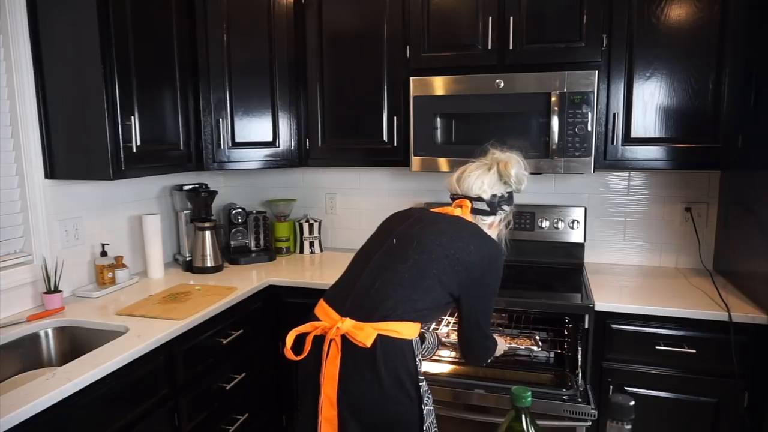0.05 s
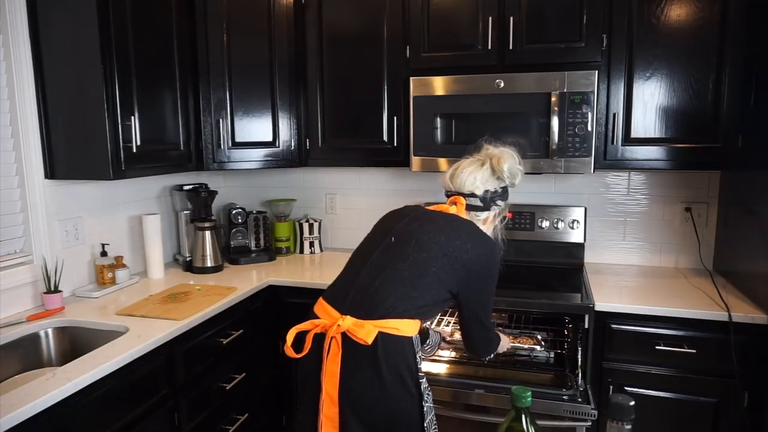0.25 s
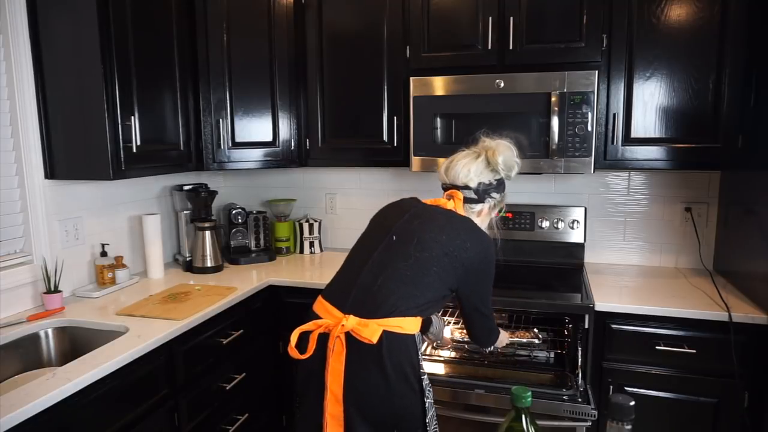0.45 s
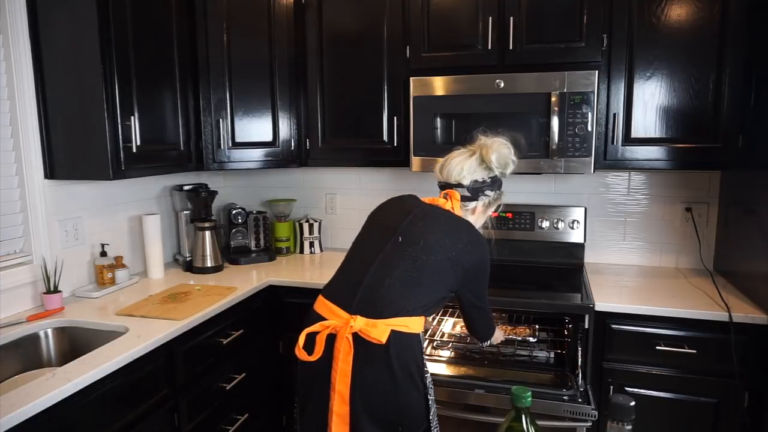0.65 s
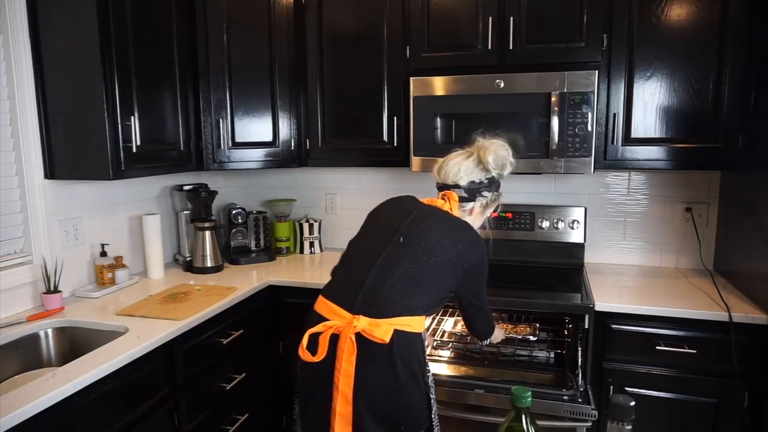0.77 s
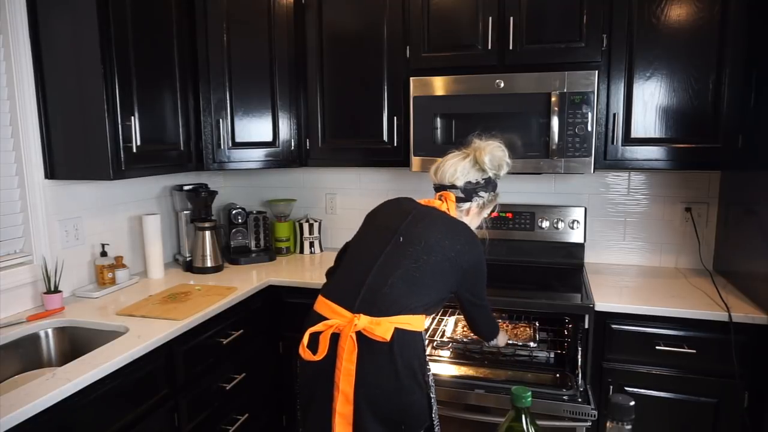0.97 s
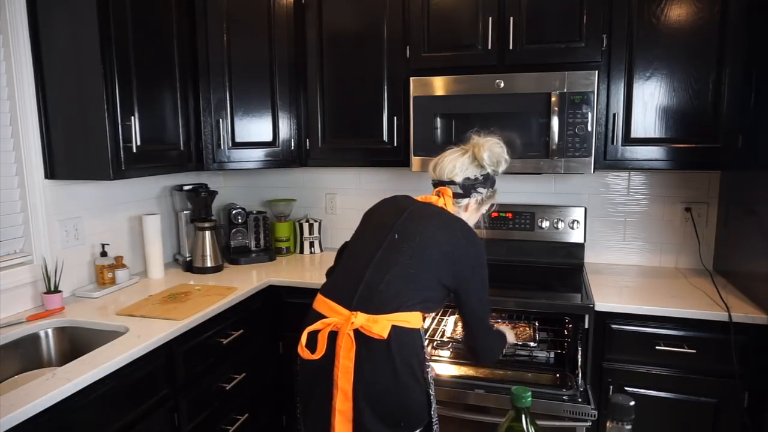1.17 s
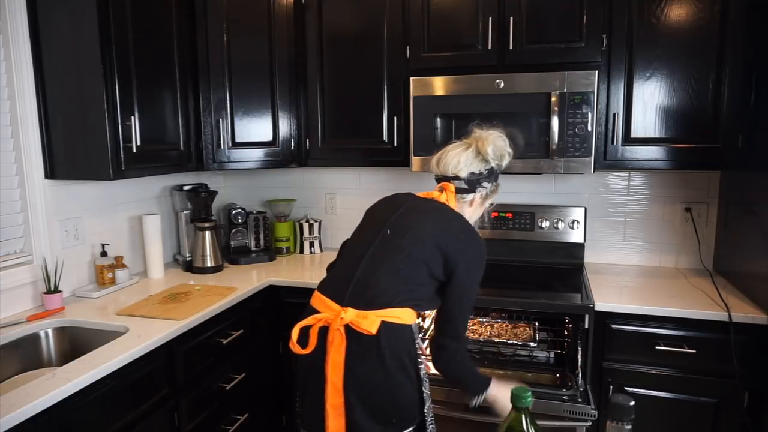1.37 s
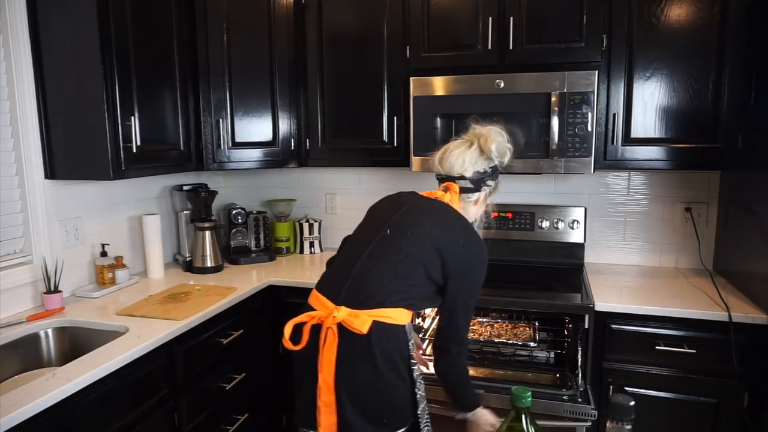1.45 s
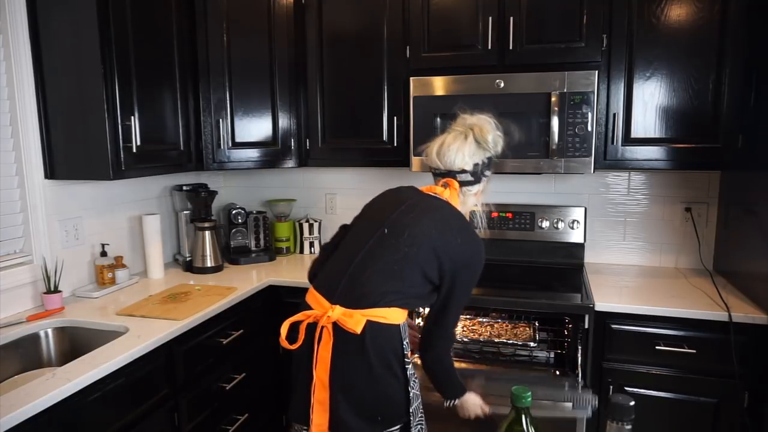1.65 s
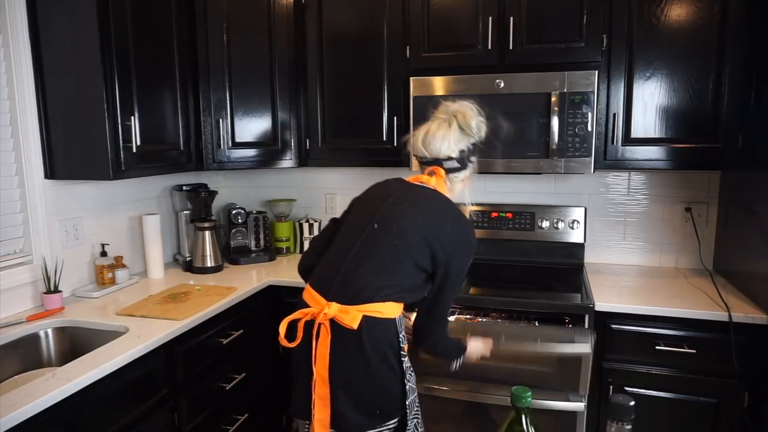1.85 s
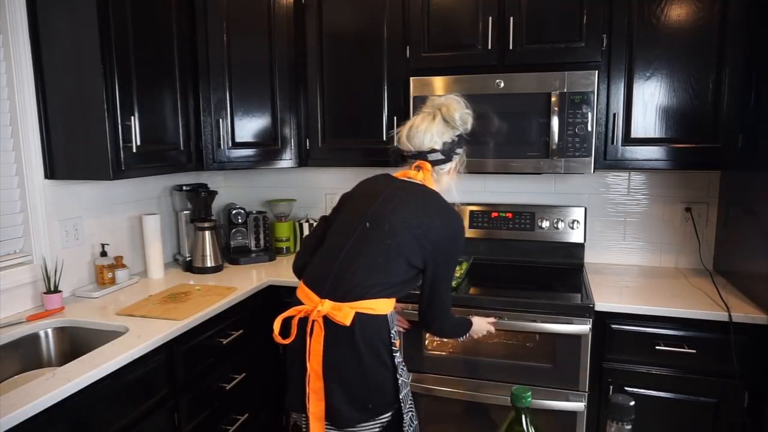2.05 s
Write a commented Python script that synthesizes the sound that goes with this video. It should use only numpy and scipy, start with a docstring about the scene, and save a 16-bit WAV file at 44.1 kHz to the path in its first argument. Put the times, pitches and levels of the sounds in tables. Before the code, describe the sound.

In a quiet home kitchen, light scuffs lead into a harsh, ringing slide of a dish over oven wires, suddenly cut; after a short pause come hollow door thuds, hinge pings and a soft creak, microphone in the room.

```python
"""A kitchen: a baking dish is nudged, then dragged along the wire rack of an electric oven; an edit cuts this off.
Then the oven door is lifted: dull knocks of the door, pings of its hinge spring, a creak, over quiet air.
Friction is a dense train of random slips, filtered by the walls, dish and wires that it shakes.
Knocks are noise dying band by band with a few door modes; pings are struck modes with a noisy clatter."""
import sys
import numpy as np
from scipy import signal
from scipy.fft import rfft, irfft
from scipy.io import wavfile

SR = 44100
rng = np.random.default_rng(int(sys.argv[2]) if len(sys.argv) > 2 else 0)


def gain_from_db(level_db):
    """Convert decibel levels to linear amplitude factors (20 dB per decade)."""
    decades = np.asarray(level_db, float) / 20
    return 10 ** decades


def persist_wave(psi):
    """Save psi, clipped to +-1, as 16-bit WAV."""
    counts = np.round(np.clip(psi, -1, 1) * 32767).astype(np.int16)
    wavfile.write(sys.argv[1], SR, np.atleast_2d(counts).T)


N = 92610

CUT_S = 0.8025   # an edit cuts the slide off here
MODES_SPREAD_S = 0.004   # modes do not all start at once
TOUCHES = 6   # lesser contacts that follow each knock or ping


def rms_one(x):
    """Normalisation: scale to unit rms."""
    return x / np.sqrt(np.mean(x ** 2) + 1e-20)


def at_hz(points, hz):
    """Interpolation of a frequency table along a logarithmic frequency axis."""
    table_hz, values = np.array(points).T
    return np.interp(np.log(hz), np.log(table_hz), values)


def in_time(rows):
    """Linear interpolation in time: each column becomes a curve with one value per sample."""
    s, *columns = np.transpose(rows)
    return [np.interp(np.arange(N) / SR, s, column) for column in columns]


def colour(x, spectrum, rings=()):
    """Linear filtering: a broad spectrum plus narrow resonances, normalised to rms 1."""
    hz = np.maximum(np.arange(N // 2 + 1) * SR / N, 1)
    in_range = (hz > spectrum[0][0]) * (hz < spectrum[-1][0])
    broad = gain_from_db(at_hz(spectrum, hz)) * in_range
    lift = 1
    for centre_hz, width_hz, db in rings:
        lift = lift + 4 * gain_from_db(db) / (1 + 2j * (hz - centre_hz) / width_hz)
    return rms_one(irfft(rfft(x) * broad * lift, N))


def grains():
    """Stick-slip friction: dense random slips of uneven size."""
    per_s, spread_db = 12000, 2.0
    size = gain_from_db(spread_db * np.minimum(rng.exponential(1, N), 2)) * rng.standard_normal(N)
    return size * (rng.random(N) < per_s / SR)


def clicks(s, gains):
    """Impulsive excitation: impulses at the given times."""
    out = np.full(N, 1e-18)
    np.add.at(out, (np.asarray(s) * SR).astype(int), gains)
    return out


def dying(x, t60):
    """Exponential decay: each impulse becomes an envelope falling 60 dB in t60."""
    return signal.lfilter([1], [1, -gain_from_db(-60 / (t60 * SR))], x)


def smear(x):
    """Moving average: an onset is spread over the starting times of the modes."""
    window = np.ones(int(MODES_SPREAD_S * SR))
    return signal.lfilter(window / len(window), [1], x)


def ring(x, hz, t60):
    """Damped resonator: a unit click sets a sine of height 1 ringing."""
    r, w = gain_from_db(-60 / (t60 * SR)), 2 * np.pi * hz / SR
    return signal.lfilter([0, np.sin(w)], [1, -2 * r * np.cos(w), r * r], x)


def near(hz, struck_hz, reach):
    """Selective excitation: modes far from the excited pitch get less, 6 dB less at reach octaves."""
    return gain_from_db(-6 * (np.log2(hz / struck_hz) / reach) ** 2)


def air():
    """Stationary background noise: coloured Gaussian noise at a constant level."""
    # spectrum of the kitchen air: (frequency [Hz], relative level per Hz [dB])
    air_colour = [(30, -11.5), (280, -6), (1100, -8.5), (7400, -22), (16000, -41)]
    level_db = -58.5
    return gain_from_db(level_db) * colour(rng.standard_normal(N), air_colour)


def scuffs():
    """Friction under brief force: each small shove has a quick rise, then an exponential decay."""
    # light scuffs, of the dish before the drag and once of the door: (time [s], level [dB], rise [s])
    scuff_rows = [(0.024, -51.5, 0.0066), (0.084, -53.5, 0.011), (.121, -46.5, .005), (0.158, -48.5, 0.006),
                  (0.226, -47, 0.0039), (1.29, -52, 0.0091)]
    # broad spectrum of a scuff: (frequency [Hz], relative level per Hz [dB])
    scuff_colour = [(300, -2.5), (1000, -1), (5000, 6.5), (16000, -21)]
    # resonances of the dish: (frequency [Hz], width [Hz], added level [dB re 4 times the broad amplitude])
    scuff_rings = [(1020, 100, -3.5), (2500, 45, -3)]
    t60_s, rings_from_s = 0.5, 0.12
    t = np.arange(N) / SR
    shape = 0
    for s, db, rise in scuff_rows:
        decay = gain_from_db(db - 60 * np.abs(t - s) / t60_s)
        shape = shape + decay * np.clip((t - s) / max(rise, 1e-4), 0, 1)
    # the dish rings once it is pushed harder
    ringing = (t > rings_from_s) & (t < CUT_S)
    ringing_noise = colour(grains(), scuff_colour, scuff_rings)
    plain_noise = colour(grains(), scuff_colour)
    return shape * np.where(ringing, ringing_noise, plain_noise)


def slide():
    """Friction-driven vibration: slips shake walls, dish and wires, modes near one pitch sing, catches jolt."""
    # friction as heard from each thing it shakes: (time [s], oven walls level [dB], dish level [dB],
    # rack wires level [dB], pitch that sings [Hz], singing level [dB])
    slide_curve = [(.241, -35, -35.5, -36, 3260, -26), (.27, -32, -28.5, -43.5, 2870, -57),
                   (.33, -38.5, -36, -43, 2920, -31.5), (.42, -40, -32.5, -35.5, 4100, -74),
                   (.435, -31.5, -27.5, -33, 3140, -26), (.50, -27, -22, -26, 2500, -48),
                   (.56, -27, -29, -23.5, 6050, -46), (.61, -30, -26.5, -22.5, 4700, -24.5),
                   (.645, -34.5, -30, -23.5, 6500, -27.5), (.69, -33, -30, -30, 5900, -33.5),
                   (.74, -35, -33.5, -31, 3920, -36.5), (.80, -39, -39.5, -39, 4630, -46)]
    # the dish catches a wire: (time [s], noise level [dB], ring level [dB],
    # first pitch struck hardest [Hz], second pitch struck hardest [Hz])
    catch_rows = [(0.2405, -28, -23, 3250, 4100), (.4280, -24, -21, 3020, 2200)]
    # spectrum of the oven walls: (frequency [Hz], relative level per Hz [dB])
    wall_colour = [(60, -13), (130, -9), (200, 0.5), (1500, -1), (2200, -38)]
    # resonances of the walls: (frequency [Hz], width [Hz], added level [dB re 4 times the broad amplitude])
    wall_rings = [(218.6, 11.3, 1), (335.4, 25.5, -0.5), (537, 146, -7), (900, 280, -12)]
    # spectrum of the dish: (frequency [Hz], relative level per Hz [dB])
    dish_colour = [(800, -14), (1400, -12), (2800, -7), (4600, -15), (9000, -31.5)]
    # spectrum of the rack wires: (frequency [Hz], relative level per Hz [dB])
    wire_colour = [(2500, -19), (4200, -3.5), (6200, -2.5), (10500, -17), (16000, -28)]
    # modes of dish and rack that the friction sets singing: (frequency [Hz])
    singing_hz = [1890, 2200, 2520, 2780, 2960, 3170, 3710, 4050, 4900, 5585, 5950, 6106, 7310]
    walls_rise_s = 0.012
    sing_reach_oct, sing_t60_s = 0.17, 2.0 / 55
    catch_t60_s, catch_ring_t60_s, catch_reach_oct = 0.1, 0.07, 0.1

    walls_db, dish_db, wires_db, sing_hz, sing_db = in_time(slide_curve)
    s, noise_db, ring_db, *struck = np.transpose(catch_rows)
    t = np.arange(N) / SR
    jolt = smear(dying(clicks(s, gain_from_db(noise_db)), catch_t60_s))
    walls_rise = np.clip((t - s[0]) / walls_rise_s, 0, 1)
    out = gain_from_db(walls_db) * walls_rise * colour(grains(), wall_colour, wall_rings)
    out += (gain_from_db(dish_db) + jolt) * colour(grains(), dish_colour)
    out += (gain_from_db(wires_db) + 0.33 * jolt) * colour(grains(), wire_colour)
    for k, hz in enumerate(singing_hz):
        sing_gain = gain_from_db(sing_db) * near(hz, sing_hz, sing_reach_oct)
        out += sing_gain * rms_one(ring(grains(), hz, sing_t60_s))
        strike = gain_from_db(ring_db) * sum(near(hz, struck_hz, catch_reach_oct) for struck_hz in struck)
        starts = s + MODES_SPREAD_S * rng.random(len(s))
        out += (-1) ** k * ring(clicks(starts, strike), hz, catch_ring_t60_s)   # signs alternate by mode
    onset = np.clip((t - s[0]) * 2 / MODES_SPREAD_S, 0, 1)
    return out * onset * (t < CUT_S)


def knocks():
    """Impact and modal decay: a thump, a crack, a tail dying band by band, and the boom of the door modes."""
    # door and cavity knocks: (time [s], level [dB], tilt [dB per octave],
    # extra tilt above the knee [dB per octave], boom level [dB re knock], thump level [dB re knock])
    knock_rows = [(1.036, -36.5, -1, 0, -11.5, -20), (1.1959, -14, 2.5, -50, -3, -17),
                  (1.272, -29.5, -5, 5, 1, -6), (1.3278, -21.5, 1, 4.5, -29, -10),
                  (1.360, -21.5, 1.5, 5, -27, -7.5), (1.4800, -16.5, -2.5, 7, -26, -7)]
    # spectrum of a knock before its tilts: (frequency [Hz], relative level [dB])
    knock_colour = [(25, -40), (100, -14), (200, -3.5), (800, -6), (4000, -23.5), (16000, -62)]
    # decay time of the tail: (frequency [Hz], t60 [s])
    knock_t60 = [(300, 0.49), (4000, 0.5), (12000, 0.16)]
    # modes of the door: (frequency [Hz], level [dB re boom], t60 [s])
    door_modes = [(205, -4.5, 0.11), (830, -6, 0.043), (1840, -10.5, 0.039)]
    edges_hz = 22 * 2 ** np.arange(0, 9.6, 1 / 3)   # third-octave bands
    pivot_hz, knee_hz = 500, 3910
    crack_t60_s, crack_db, rise_cycles = 0.075, 5, 0.38
    thump_hz, thump_t60_s = 460, 0.014
    dull_hz, touches_s, touch_db = 2500, 0.04, -14   # door modes are struck dull, without sharp treble; the door shudders after each knock

    s, db, tilt_db, top_db, boom_db, thump_db = np.transpose(knock_rows)
    white = rng.standard_normal((2, N))
    out = 0
    for k, (low, high) in enumerate(zip(edges_hz, edges_hz[1:])):
        hz = np.sqrt(low * high)
        tilt = tilt_db * np.log2(hz / pivot_hz) + top_db * max(np.log2(hz / knee_hz), 0)
        blows = clicks(s, gain_from_db(db + tilt + at_hz(knock_colour, hz)))
        tail = dying(blows, at_hz(knock_t60, hz))
        crack = gain_from_db(crack_db) * dying(blows, crack_t60_s)
        # a rise of so many cycles makes the lows come later
        r = np.exp(-hz / (rise_cycles * SR))
        envelope = signal.lfilter([1 - r], [1, -r], tail + crack)
        band = signal.butter(2, [low, high], "band", fs=SR, output="sos")
        out = out + envelope * signal.sosfilt(band, white[k % 2])

    # two equal resonators in series give the thump a swelling onset
    thump = ring(clicks(s, gain_from_db(db + thump_db)), thump_hz, thump_t60_s)
    out = out + ring(thump, thump_hz, thump_t60_s) * 2 * np.pi * thump_hz / SR

    luck_db = rng.normal(0, 2.0, (len(s), len(door_modes)))
    late = rng.exponential(touches_s, (len(s), TOUCHES))
    times = np.c_[s, s[:, None] + late]
    dull = signal.butter(2, dull_hz, fs=SR, output="sos")
    for k, (hz, mode_db, t60) in enumerate(door_modes):
        size = np.c_[np.ones(len(s)), gain_from_db(touch_db) * rng.standard_normal(late.shape)]
        gain = gain_from_db(db + boom_db + mode_db + luck_db[:, k])
        blows = clicks(times, gain[:, None] * size)
        out = out + (-1) ** k * ring(signal.sosfilt(dull, blows), hz, t60)
    return out


def hinge():
    """Modal excitation: quick touches ring the spring modes near a pitch, with dying clatter; turning creaks."""
    # hinge pings: (time [s], level [dB], pitch struck hardest [Hz], reach [octaves], clatter level [dB])
    ping_rows = [(1.497, -45.5, 2500, 0.9, -40.5), (1.702, -47, 6020, 0.086, -57.5),
                 (1.716, -55.5, 3720, 0.068, -67), (1.745, -49.5, 3300, 0.32, -54.5),
                 (1.8463, -41, 4400, 0.33, -41.5), (1.950, -49, 4200, 0.11, -62)]
    # modes of the hinge spring: (frequency [Hz])
    spring_hz = [2160, 2358, 2775, 3560, 3709, 4183, 5238, 5885]
    # the same modes in the same order: (level [dB re ping], t60 [s])
    spring_modes = [(-0.5, 0.23), (7, 0.12), (-3, 0.11), (-6.5, 0.3), (-1, 0.17), (-3, 0.23), (0, 0.16),
                    (-6, 0.17)]
    # broad spectrum of the clatter: (frequency [Hz], relative level per Hz [dB])
    clatter_colour = [(900, -9), (2300, 7.5), (5500, -3.5), (16000, -38)]
    # the hinge turns: (time [s], level [dB])
    creak_curve = [(1.55, -49.5), (1.64, -58), (1.88, -53), (1.915, -43), (1.96, -52.5), (2.0, -53.5),
                   (2.05, -62)]
    # broad spectrum of the creak: (frequency [Hz], relative level per Hz [dB])
    creak_colour = [(250, -3), (600, -2), (2500, 0), (6000, -17), (16000, -51)]
    # resonance of the creak: (frequency [Hz], width [Hz], added level [dB re 4 times the broad amplitude])
    creak_rings = [(1090, 134, -5)]
    touches_s, clatter_t60_s = 0.019, 0.2
    ring_width_hz, ring_db = 49, -9

    s, db, struck_hz, reach, clatter_db = np.transpose(ping_rows)
    # the clatter shakes the same modes
    rings = [(hz, ring_width_hz, ring_db) for hz in spring_hz]
    noise = colour(rng.standard_normal(N), clatter_colour, rings)
    out = smear(dying(clicks(s, gain_from_db(clatter_db)), clatter_t60_s)) * noise
    # a second difference lifts the treble: high pings clatter brighter
    bright_gain = gain_from_db(clatter_db) * (struck_hz / 5000) ** 9.8
    out += dying(clicks(s, bright_gain), clatter_t60_s) * np.diff(noise, 2, prepend=[0, 0])
    for hz, (mode_db, t60) in zip(spring_hz, spring_modes):
        late = rng.exponential(touches_s, (len(s), TOUCHES))
        size = np.c_[np.ones(len(s)), rng.normal(0, 0.37, (len(s), TOUCHES))]
        gain = gain_from_db(db + mode_db) * near(hz, struck_hz, reach)
        starts = s + MODES_SPREAD_S * rng.random(len(s))
        out += ring(clicks(np.c_[starts, s[:, None] + late], gain[:, None] * size), hz, t60)
    creak_db, = in_time(creak_curve)
    turning = np.arange(N) > creak_curve[0][0] * SR
    return out + gain_from_db(creak_db) * turning * colour(grains(), creak_colour, creak_rings)


def scene():
    """Superposition: all sources add over the air of the kitchen."""
    return (air() + scuffs() + slide() + knocks() + hinge())[None]


def low_pass(x):
    """Removes everything above the highest recorded frequency."""
    return signal.sosfilt(signal.butter(12, 15900, fs=SR, output="sos"), x)


def record(dry):
    """High-pass filtering: the microphone drops the deep bass."""
    mic_cut_hz = 62
    high_pass = signal.butter(2, mic_cut_hz, "high", fs=SR, output="sos")
    mix = signal.sosfilt(high_pass, dry)
    return low_pass(mix)


dry = scene()
out = record(dry)
persist_wave(out)
```